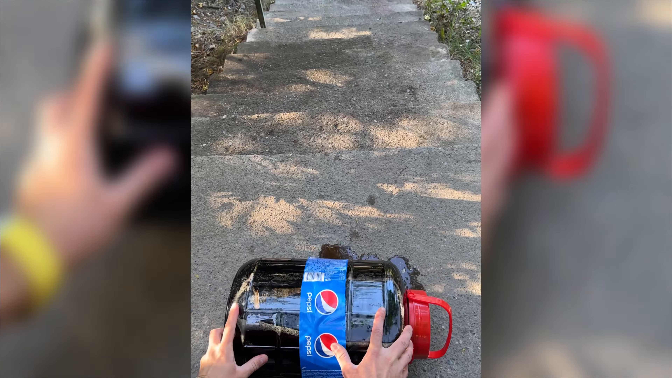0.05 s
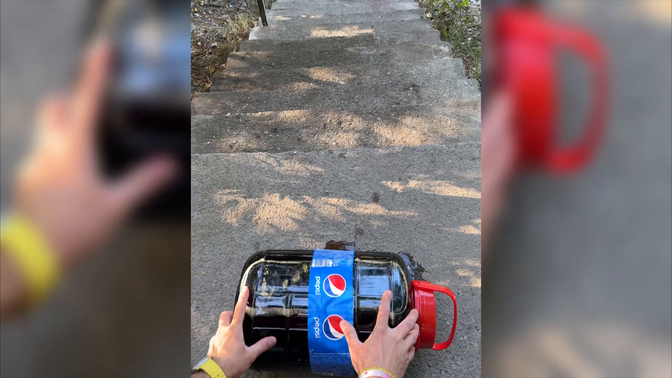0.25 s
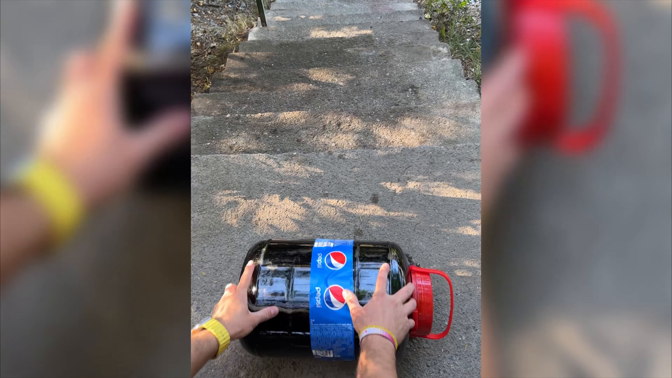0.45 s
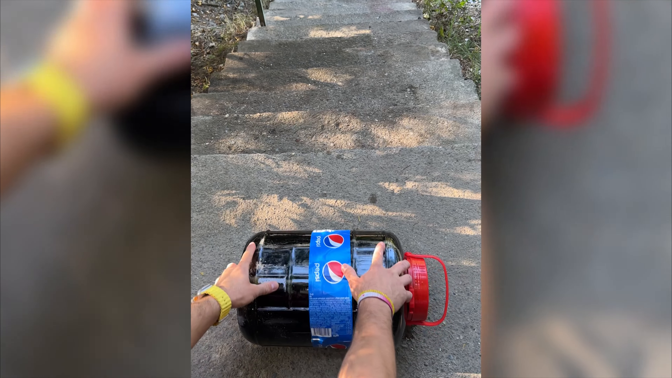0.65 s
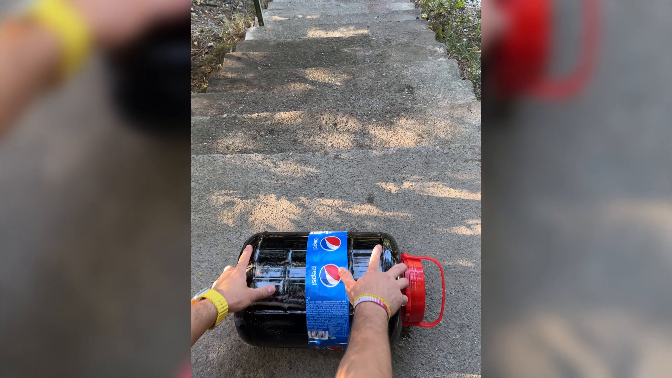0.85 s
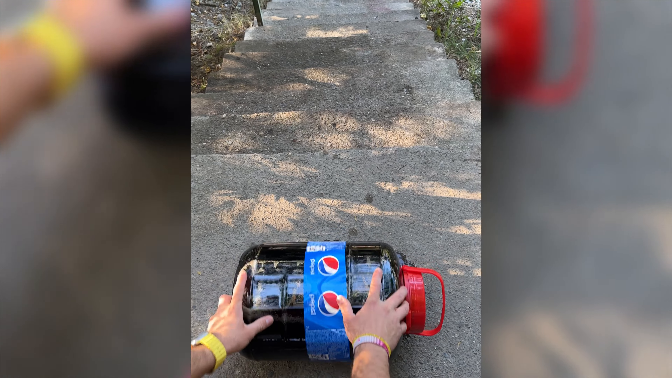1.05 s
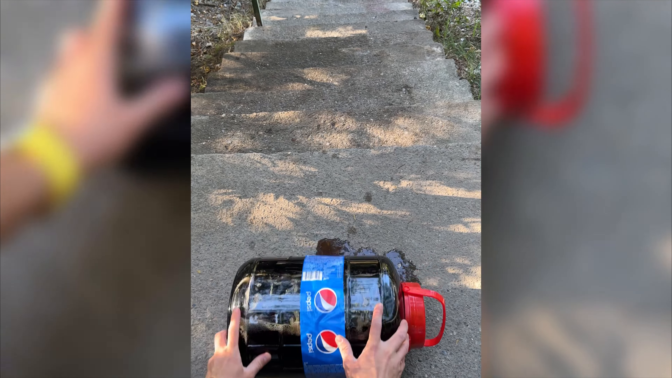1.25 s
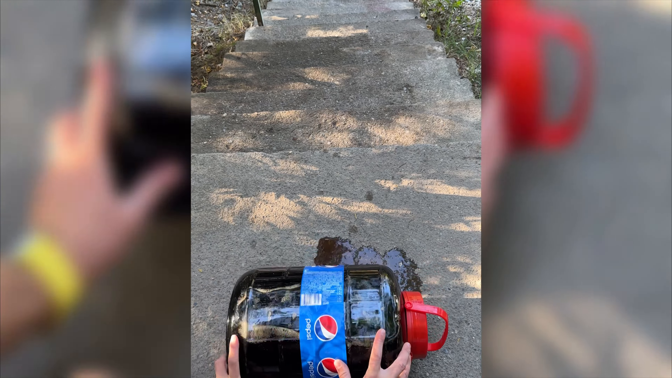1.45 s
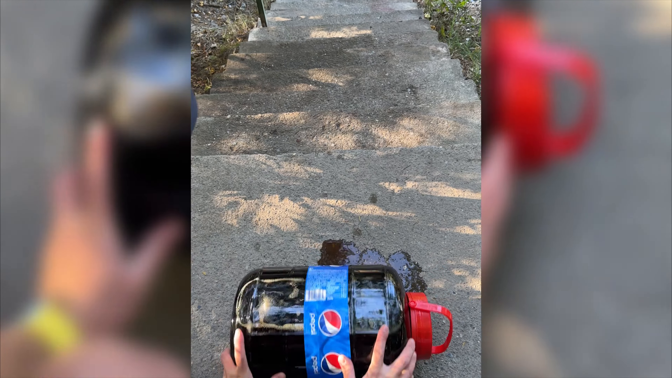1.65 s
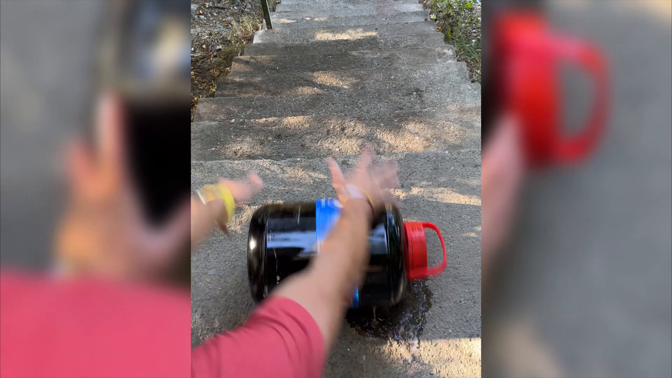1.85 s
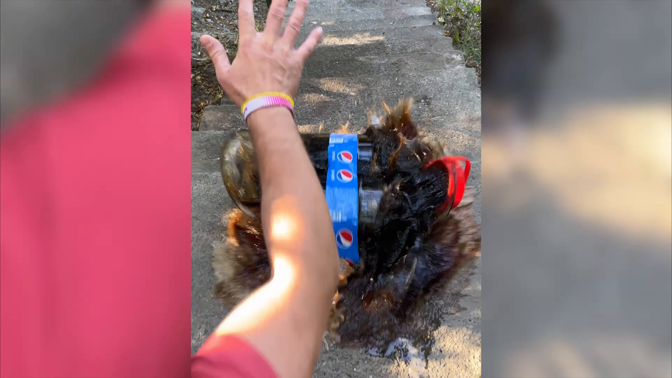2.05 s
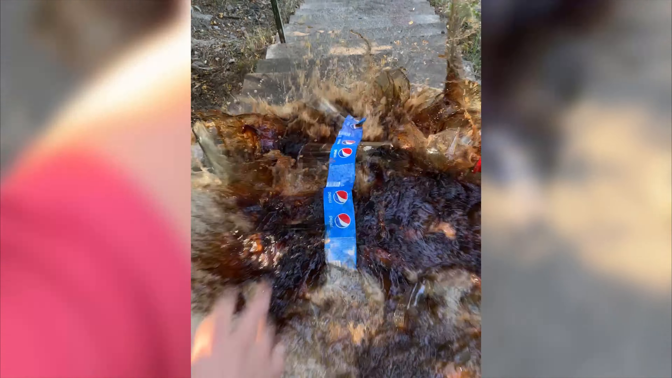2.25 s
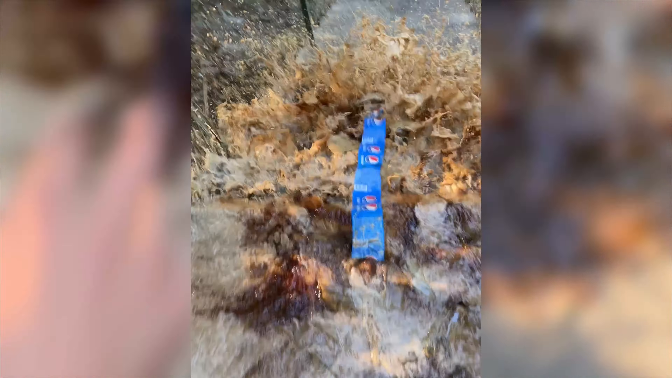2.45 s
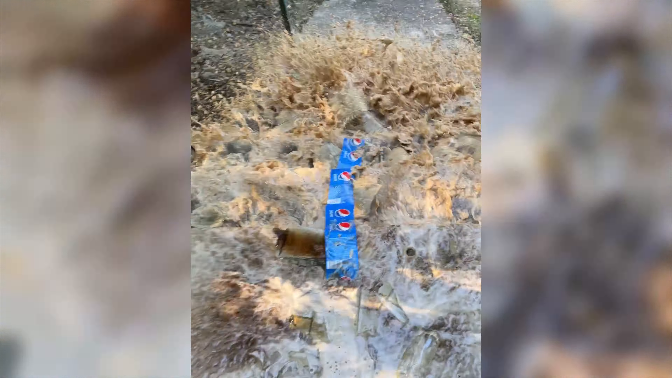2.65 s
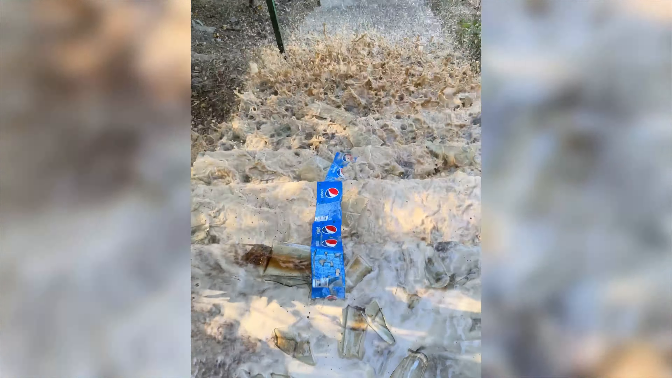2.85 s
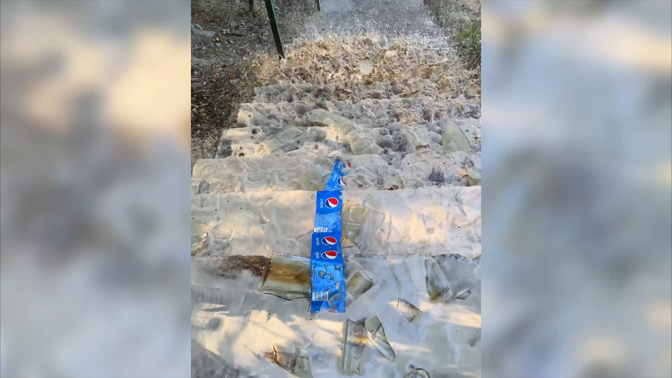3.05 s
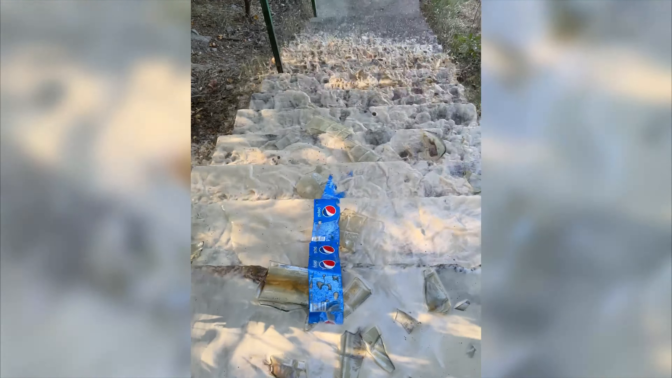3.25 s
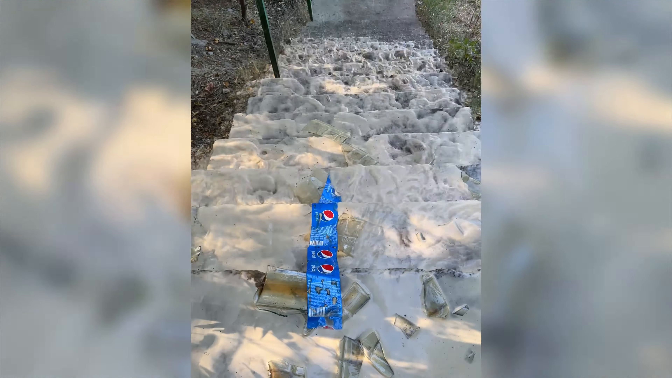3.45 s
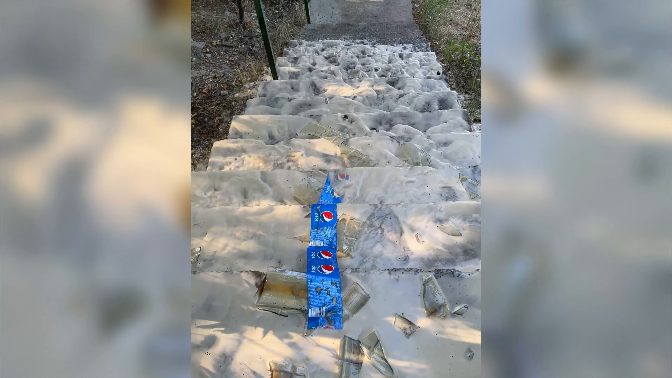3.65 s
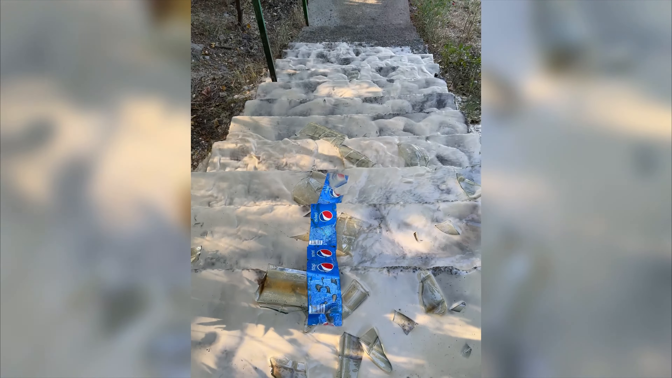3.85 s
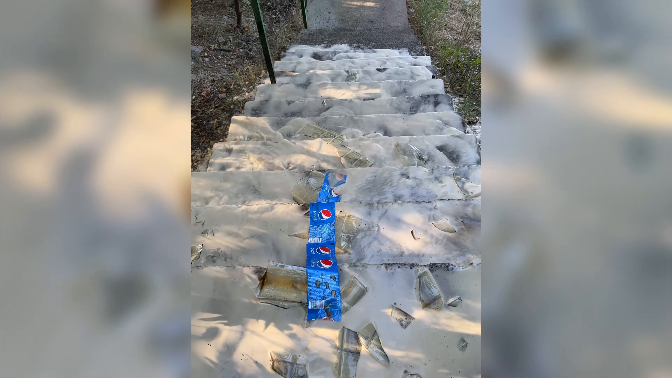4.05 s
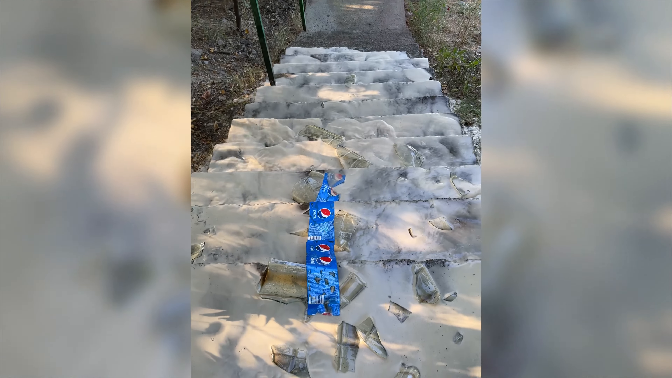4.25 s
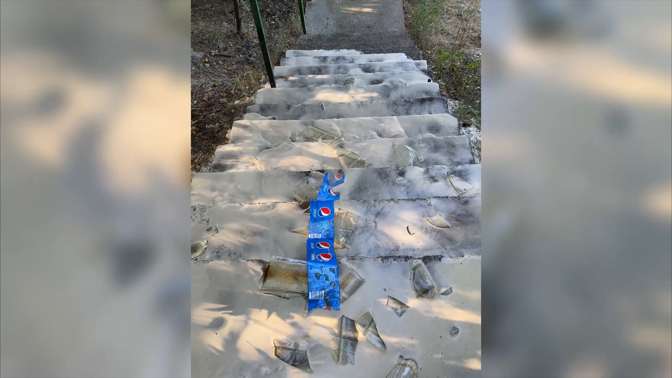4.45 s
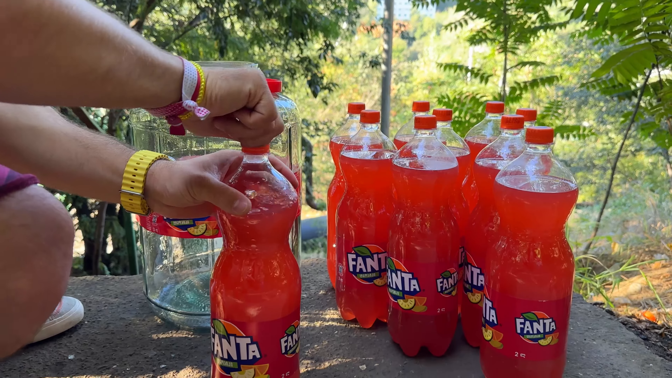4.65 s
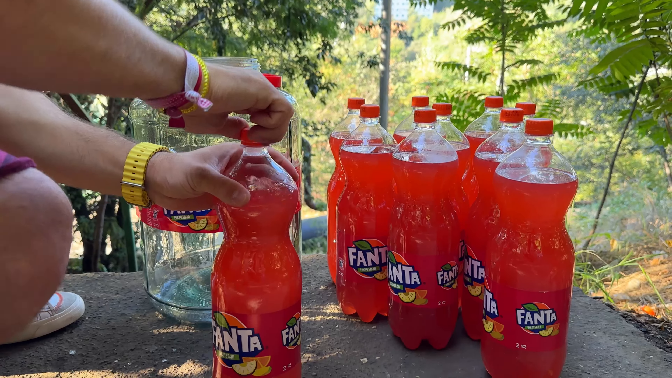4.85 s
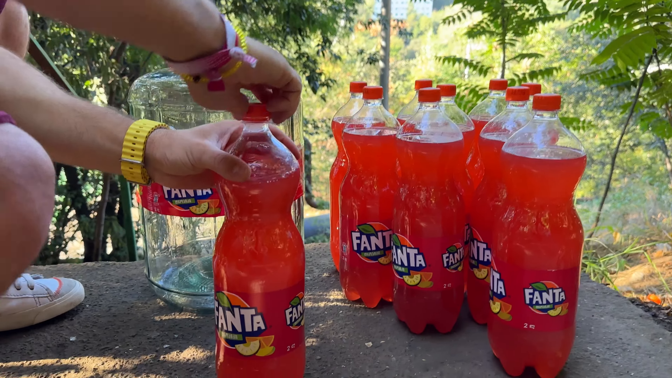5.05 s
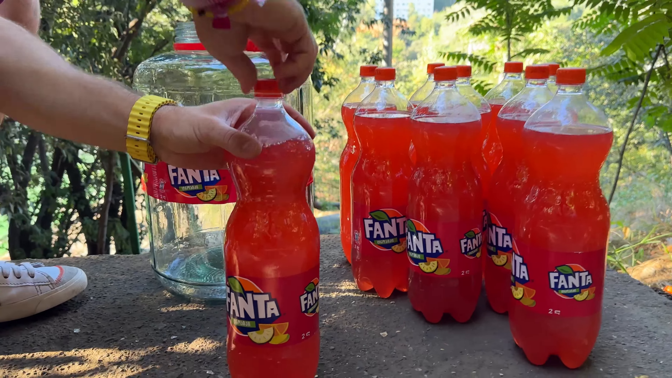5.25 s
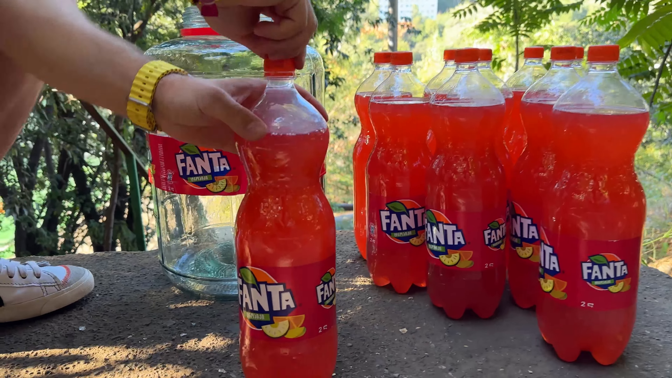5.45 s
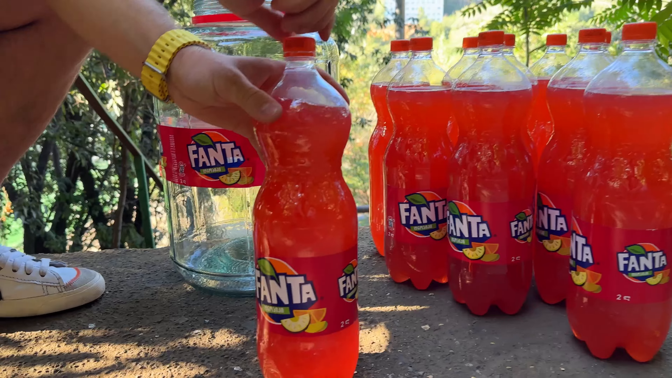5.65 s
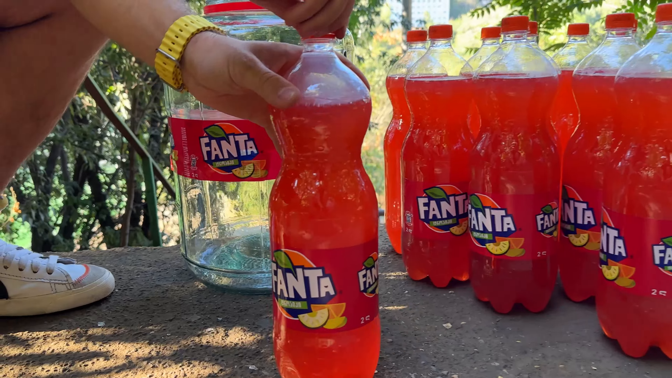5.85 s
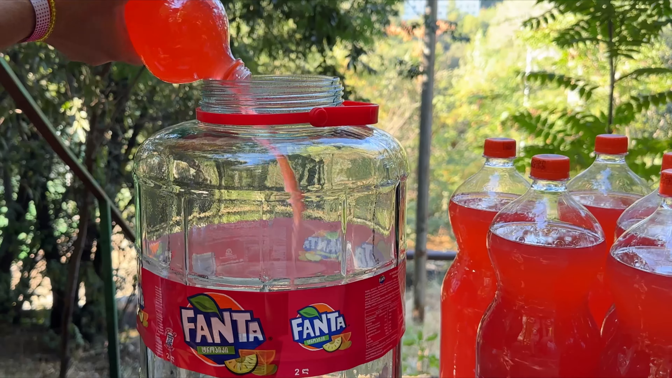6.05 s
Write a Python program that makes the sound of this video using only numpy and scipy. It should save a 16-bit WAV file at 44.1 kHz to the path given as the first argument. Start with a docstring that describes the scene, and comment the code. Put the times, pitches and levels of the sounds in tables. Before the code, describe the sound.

Quiet outdoor air with low distant traffic. From 0 to 1.7 s a heavy full glass jar is handled on gritty concrete: soft dull knocks and short scrapes, the clearest near 0.67 and 1.02 s. At 1.76 s it shatters: a dense, very loud run of crunching, ringing blows with thuds and a gush of liquid, strongest until about 2.0 s. It eases, then breaks hard again around 2.25 to 2.35 s, with splashing, splinters and fizz, and more clatter near 2.8 s. After 2.9 s shards clink sparsely, at 3.18, 3.5 and a bright skid at 3.81 s, over faint foam hiss. At 4.58 s the scene cuts abruptly to a fuller traffic wash with faint hum. At 5.01 s a plastic cap cracks open with a sputtering gas blast, ending sharply near 5.2 s. Light twisting scuffs and small clicks continue to about 6.1 s. Close microphone, short step echoes, wide stereo.

```python
"""A large glass jar of soda, nudged by hands over gritty concrete outdoors, bursts on the steps: each
shard blow is a burst of micro-cracks with decaying modes, and the drink gushes and fizzes as shaped noise.
The scene changes to a bottle cap, cracked open with a blast of gas and twisted further by damped modes,
scuffs and sputtering noise. Filtered noise gives the background: distant traffic, and a low rumble that
swells where the jar is moved and lands. Two ports hear it with phase and level differences over frequency."""
import sys
import numpy as np
from scipy import signal
from scipy.fft import rfft, irfft
from scipy.io import wavfile
from scipy.ndimage import uniform_filter1d

SR = 44100
rng = np.random.default_rng(int(sys.argv[2]) if len(sys.argv) > 2 else 0)


def dump(signal):
    """Clip the signal to [-1, 1] and save it as 16-bit WAV at the path in sys.argv[1]."""
    limited = np.clip(np.atleast_2d(signal).T, -1, 1)
    pcm = np.round(limited * 32767).astype(np.int16)
    wavfile.write(sys.argv[1], SR, pcm)


N = 269010
T = np.arange(N) / SR  # time in seconds

# Blows of the shards. Each row: start in seconds, dull crunch in dB, bright crunch in dB,
# low ring in Hz, its level in dB, high ring in Hz, its level in dB.
SHARD_BLOWS = [(1.764, -19, -17, 730, -8, 2120, -17), (1.777, -18, -12.5, 810, -10.5, 2840, -10),
               (1.793, -12, -15, 693, -15, 1840, -16), (1.808, -9, -11.5, 818, -11.5, 2050, -16),
               (1.844, -17, -9.5, 1710, -26, 3590, -16), (1.861, -6, -11.5, 1537, -15, 2240, -16.5),
               (1.878, -2, -14, 1700, -11, 4400, -7), (1.887, -13, -10, 1000, -10.5, 2250, -6.5),
               (1.918, -2.5, -21, 1610, -13, 3060, -16.5), (1.929, -10, -33, 650, -12, 2520, -28),
               (1.973, -7.5, -18, 638, -11, 2020, -24), (1.979, -24, -21, 597, -22, 2244, -14.5),
               (2.014, -11, -21.5, 807, -11.5, 2010, -22.5), (2.047, -29, -40, 1260, -29.5, 2460, -37),
               (2.061, -24, -26, 710, -21, 5700, -14.5), (2.069, -12, -10.5, 630, -13.5, 3660, -20),
               (2.092, -27, -36, 840, -19, 6100, -28), (2.112, -18, -45, 657, -19.5, 2640, -28.5),
               (2.124, -24, -27.5, 720, -9, 2590, -20), (2.14, -20, -24, 1270, -12, 2210, -25),
               (2.151, -22, -21, 743, -10.5, 2510, -16), (2.185, -36, -20, 670, -20, 2830, -28),
               (2.204, -28.5, -42, 668, -12, 2470, -35), (2.221, -26, -28, 684, -19, 2660, -27.5),
               (2.237, -24, -22, 920, -20, 4050, -16), (2.248, -7.5, -15, 820, -13, 2540, -11),
               (2.257, -6.5, -23, 638, -24, 2170, -16.5), (2.275, -6.5, -4, 1390, -9, 4100, -12),
               (2.292, -8, -5.5, 1410, -30.5, 6130, -7.5), (2.316, -22, -16, 1800, -19, 3030, -26),
               (2.324, -9.5, -11, 630, -18.5, 7070, -16.5), (2.351, -12.5, -9, 840, -20, 2230, -19.5),
               (2.398, -11.5, -24, 1500, -18, 2250, -16), (2.433, -13.5, -31, 565, -17, 1930, -16),
               (2.456, -18, -30, 510, -25, 2505, -12.5), (2.492, -30, -30, 1020, -17, 3740, -27),
               (2.504, -7, -22, 752, -10, 5860, -13.5), (2.52, -23, -43, 590, -16, 2620, -32),
               (2.562, -33, -47, 990, -24, 2240, -21), (2.574, -16.5, -53, 1023, -18, 2330, -21),
               (2.589, -25, -36, 1010, -20, 2230, -22), (2.612, -20, -22, 1010, -31, 2980, -17),
               (2.62, -9.5, -15, 1240, -16, 2000, -18), (2.643, -12, -21, 987, -12, 2850, -18),
               (2.659, -12, -29, 612, -16, 2150, -22), (2.674, -16, -18.5, 710, -12, 2440, -28),
               (2.699, -14, -20, 754, -12.5, 1970, -17), (2.717, -12, -19, 1042, -13.5, 2680, -17),
               (2.756, -40, -42, 1040, -27.5, 2530, -39), (2.783, -20, -43, 1648, -21.5, 2550, -29),
               (2.808, -16, -9, 1058, -14, 2646, -8), (2.839, -7, -8.5, 1080, -27, 2020, -11.5),
               (2.854, -9.5, -35, 1750, -22, 2930, -22), (2.873, -13, -37, 1767, -18, 2640, -16),
               (2.896, -20, -26.5, 1060, -27.5, 2700, -28.5), (2.975, -38, -32, 1690, -49, 4030, -35),
               (3.032, -32, -44, 1160, -40, 2670, -34), (3.071, -34, -27.5, 1920, -37, 2494, -21.5),
               (3.099, -28, -28, 1280, -31, 3680, -19), (3.135, -30.5, -44, 1095, -28, 2460, -36),
               (3.158, -28, -36, 1820, -28, 1900, -40), (3.178, -12.5, -19.5, 1086, -19.5, 4320, -47),
               (3.217, -12.5, -28, 1750, -19.5, 2470, -35), (3.239, -39, -34, 1780, -35, 2620, -28),
               (3.27, -28, -28, 1010, -50, 2650, -20), (3.298, -47, -26.5, 1050, -53, 2700, -20.5),
               (3.321, -27, -35, 1052, -34, 4260, -26), (3.362, -31, -30.5, 1060, -36, 2520, -41),
               (3.403, -31, -47, 1490, -37, 6260, -34), (3.454, -29, -42, 1450, -52, 1890, -30),
               (3.474, -17, -20.5, 1460, -40, 1930, -26), (3.519, -21.5, -16, 1098, -17.5, 6550, -28),
               (3.555, -44, -43, 1100, -45, 5800, -34), (3.584, -34, -24.5, 1150, -37, 6350, -29),
               (3.676, -42, -62, 1540, -44, 3560, -50), (3.81, -56, -12, 1790, -52, 2310, -23),
               (4.16, -49, -41, 517, -59, 4150, -51), (4.313, -50, -35, 694, -53, 2440, -55),
               (4.521, -39, -38.5, 1320, -47, 2630, -38)]
# Heavy pieces landing on the wet steps. Each row: start in seconds, level in dB, pitch in Hz.
HEAVY_THUDS = [(1.765, -19.5, 244), (1.792, -18, 467), (1.845, -20, 140), (1.876, -19.5, 118),
               (1.89, -16, 178), (1.916, -16.5, 349), (1.973, -15.5, 414), (2.149, -15.5, 221),
               (2.248, -20.5, 350), (2.257, -9.5, 186), (2.292, -18, 229), (2.35, -17.5, 251),
               (2.397, -20, 271), (2.457, -25, 218), (2.489, -19, 315), (2.674, -25, 409),
               (2.841, -21, 385), (2.894, -21, 395), (3.476, -29.5, 132), (3.81, -33, 163)]
# Modes of the largest curved shard. Each row: frequency in Hz, relative level in dB, T60 in seconds.
BIG_SHARD_MODES = [(1076, -2, 0.27), (1730, -3.5, 0.19), (2550, -22, 0.78), (2830, -19, 0.15),
                   (3670, -8, 0.27), (4310, 7.5, 0.06), (5100, 0, 0.12), (5577, 8.5, 0.042),
                   (6560, 0, 0.053), (7000, -3, 0.069), (8300, -10, 0.19)]
# Landings of that shard. Each row: start in seconds, level in dB.
BIG_SHARD_LANDINGS = [(2.575, -51), (2.81, -42), (2.84, -49), (2.874, -29), (3.03, -40), (3.098, -59),
                      (3.176, -22.5), (3.239, -59), (3.267, -42), (3.298, -37), (3.322, -40), (3.519, -57)]
# Clear rings of single shards. Each row: start in seconds, pitch in Hz, level in dB, T60 in seconds.
FREE_RINGS = [(1.762, 705, -9, .079), (2.0, 2700, -23, .04), (2.112, 680, -17.5, .39),
              (2.248, 300, -9.5, .066), (2.32, 7100, -16, .05), (2.561, 2240, -20.5, .13),
              (2.574, 1000, -23.5, .18), (2.808, 990, -19, .24), (2.808, 3400, -17.5, .06),
              (2.808, 5600, -19, .05), (2.808, 7050, -21, .05), (2.874, 3720, -29, .15),
              (2.885, 1100, -15.5, .062), (2.9, 400, -28, .078), (2.9, 1730, -31.5, .4),
              (3.07, 2500, -32, .058), (3.098, 5800, -27, .045), (3.13, 6100, -33, .05),
              (3.19, 2400, -24.5, .2), (3.238, 2400, -30, .09), (3.454, 1480, -34, .24),
              (3.4755, 1500, -31, .16), (3.4755, 6350, -39, .13), (3.4755, 8300, -28.5, .12),
              (3.518, 1135, -36, .11), (3.584, 1140, -31, .09), (3.81, 2200, -15, .035),
              (3.81, 5730, -22, .04), (3.81, 2335, -36, .3), (3.81, 2385, -27.5, .27),
              (3.81, 3365, -32, .12), (3.99, 2360, -42, .21), (4.313, 2360, -44, .08),
              (4.313, 3400, -44, .07), (4.313, 5800, -42, .04)]
# Level curves of the flowing liquid, loose splinters and foam. Each row: time in seconds, level in dB.
GUSH_LEVEL = [(1.755, -22), (1.765, -22.5), (1.9, -20.5), (2.06, -24.5), (2.2, -27.5), (2.26, -23.5),
              (2.48, -28), (2.73, -30), (2.9, -32), (2.95, -48.5), (3.1, -55)]
SPRAY_LEVEL = [(1.755, -55), (1.8, -28), (1.9, -20), (2.1, -57), (2.24, -63), (2.4, -42), (2.72, -36),
               (2.95, -38.5), (3.1, -45)]
FOAM_LEVEL = [(1.75, -65), (1.8, -57), (1.88, -38), (1.94, -33), (2.12, -56.5), (2.5, -34), (2.88, -40),
              (3.57, -47.5), (4.58, -47.5)]
# Knocks of the handled jar, then of the bottle cap. Each row: start in seconds, dull crunch in dB,
# bright crunch in dB, ring in dB, thump in dB.
JAR_KNOCKS = [(0.036, -36, -45, -43.5, -46), (0.058, -30, -49, -40, -58), (0.191, -40, -50, -44, -43),
              (0.349, -41, -47, -35, -46), (0.373, -33, -24.5, -34, -36), (0.387, -31, -47, -35, -45),
              (0.431, -35, -64, -40, -38), (0.564, -39, -48, -53, -51), (0.606, -31.5, -28, -53, -42),
              (0.671, -19.5, -25.5, -35, -44), (0.846, -44, -41, -45, -48), (0.898, -41, -46, -47, -54),
              (0.953, -50, -55, -41, -55), (1.014, -31, -21.5, -28.5, -51), (1.026, -20.5, -27, -50, -45),
              (1.06, -27, -30, -27, -39.5), (1.122, -47, -35.5, -35, -45), (1.159, -34.5, -61, -33, -31),
              (1.202, -34, -34, -34, -36), (1.361, -51, -44, -52, -41), (1.418, -53, -45, -35.5, -46),
              (1.667, -53, -40, -43, -34), (1.712, -46, -45, -31, -31)]
CAP_KNOCKS = [(5.014, -11.5, -33, -28, -27), (5.289, -51, -37, -42, -54), (5.316, -48, -32, -51, -54),
              (5.335, -46, -44, -52, -52), (5.516, -32.5, -65, -48, -45), (5.583, -27, -52, -33, -38),
              (5.609, -31, -62, -37, -41), (5.841, -42, -47, -43, -30), (5.975, -48, -51, -47, -55)]
# Modes of the full jar, its weight on the concrete, the plastic cap and neck, and the bottle's thump.
# Each row: frequency in Hz, relative level in dB, T60 in seconds.
JAR_MODES = [(567, -4, 0.066), (824, -1.5, 0.076), (1100, -2, 0.072), (1280, -10.5, 0.064),
             (1548, -0.5, 0.053), (2230, -7, .05), (2890, -2, 0.053), (3210, -10, 0.026),
             (4090, -16, 0.026)]
JAR_THUMP_MODES = [(129, 3, 0.11), (188, 7, 0.065)]
CAP_MODES = [(890, -4, .026), (1063, 7, 0.027), (1290, 6, 0.046), (2060, -9, .02), (4300, -15.5, 0.019),
             (6100, -5, .017)]
BOTTLE_THUMP_MODES = [(152, 4, 0.096), (213, 1, 0.15)]
# Scuffs of the handled jar on grit, then shards skidding; and scuffs of fingers on the cap.
# Each row: start in seconds, length in seconds, bright scrape in dB, dull body in dB.
GRIT_STROKES = [(.02, 0.077, -45.5, -52), (.18, 0.041, -58, -46), (.22, 0.045, -58, -49),
                (.345, 0.07, -47.5, -40.5), (.428, 0.029, -77, -45), (.6, 0.022, -42, -56),
                (.675, 0.055, -85, -48), (.85, 0.02, -49, -45), (.893, 0.027, -64, -45.5),
                (1.015, 0.072, -53, -41.5), (1.12, 0.12, -50.5, -42), (1.36, 0.018, -56, -59),
                (1.41, 0.069, -56, -42.5), (1.58, 0.066, -57.5, -69), (1.665, 0.099, -47, -44),
                (3.06, 0.026, -47, -47), (3.808, 0.091, -37, -78)]
CAP_STROKES = [(4.66, 0.11, -54.5, -47.5), (5.28, 0.084, -45, -66), (5.495, 0.079, -44, -58),
               (5.565, 0.097, -42, -50), (5.75, 0.038, -53.5, -61), (5.825, 0.045, -44, -38.5),
               (5.965, 0.0442, -57, -55), (6.07, 0.057, -60, -49), (5.35, 0.11, -56, -68),
               (5.65, 0.37, -53, -50)]
# Relative spectra of cracking glass, grit, foam, rubbed cap, escaping gas, and the background as heard
# around the steps and around the bottles. Each row: frequency in Hz, density in dB per Hz.
CRACK_SPECTRUM = [(300, -14), (700, -28), (1500, -13), (2500, -2), (3200, -5.5), (4500, -0.5), (6000, 2.5),
                  (7000, 3.5), (8500, -2.5), (10500, -0.5), (13000, -4), (15500, -19)]
GRIT_SPECTRUM = [(300, -2), (700, -31), (1500, -1.5), (2500, 1.5), (3200, 1), (4500, 0), (6000, -0.5),
                 (7000, -1), (8500, -5), (10500, -5), (13000, -6), (15500, -17)]
FOAM_SPECTRUM = [(150, -30), (400, -0.5), (700, -7.5), (1300, -21), (2200, -1.5), (4500, -2), (6500, 2.5),
                 (9000, -0.5), (12000, -4.5), (15500, -2)]
CAP_RUB_SPECTRUM = [(300, -9), (1500, 10.5), (3200, 2), (4500, -3), (6000, -4.5), (8500, -4), (10500, -4.5),
                    (13000, -18.5), (15500, -10.5)]
GAS_SPECTRUM = [(300, -20), (700, -26.5), (1500, -14), (2500, -7.5), (3200, -9.5), (4500, -8.5),
                (6000, -3.5), (7000, -10), (8500, -0.5), (10500, -2.5), (13000, -3), (15500, -2.5)]
STEPS_AIR_SPECTRUM = [(30, -2.5), (60, 5), (120, -2), (200, -8.5), (400, -8), (700, -14), (1300, -17),
                      (2200, -21), (3200, -27), (4500, -37.5), (6500, -41), (9000, -49.5), (12000, -66),
                      (15000, -49.5)]
BOTTLES_AIR_SPECTRUM = [(30, -4), (60, 6.5), (120, -3), (200, -4.5), (400, -14.5), (700, -14), (1300, -8.5),
                        (2200, -16), (3200, -22.5), (4500, -37), (6500, -38), (9000, -48), (12000, -57.5),
                        (15000, -65.5)]
# Level curve of the low rumble: distant traffic, swelling where the jar is moved and lands.
# Each row: time in seconds, level in dB.
RUMBLE_LEVEL = [(0, -43.5), (.78, -44.5), (1.19, -39), (1.32, -45.5), (1.41, -36.5), (1.63, -49),
                (1.8, -30), (1.9, -28), (1.96, -60.5), (2.29, -55.5), (2.6, -50.5), (4.1, -53.5),
                (4.3, -49), (5.45, -48.5), (5.9, -43), (6.1, -42)]
# Level curves of the wash of traffic and of a wavering hum near 125 Hz.
# Each row: time in seconds, level in dB.
WASH_LEVEL = [(0, -44.5), (1.3, -45.5), (1.7, -46.5), (3.3, -50.5), (4, -51), (4.57, -51), (4.59, -42),
              (4.9, -40.5), (6.1, -41.5)]
HUM_LEVEL = [(4.58, -43), (4.8, -44), (5.3, -46.5), (5.5, -68), (6.1, -61)]
# The two ports on the steps, at the bottles, and for the air around the bottles. Each row:
# frequency in Hz, likeness from 0 to 1, lead of the right port in radians, left over right in dB.
STEPS_PORTS = [(40, .96, 0, .3), (150, 1, 0, .3), (400, .97, -.2, 2), (800, .98, 0, 2), (1900, 1, 0, 0),
               (2600, .75, -.1, -.7), (3200, .6, -.1, 0), (4000, .7, -.1, 2), (5000, .29, -.3, .8),
               (6000, .89, .7, 0), (7500, .86, 1.6, .5), (9000, .78, 1.7, -.5), (10200, .82, 2.6, 1),
               (10800, .995, 3.12, 0), (13200, .995, 3.16, 0), (14000, .84, 3.7, .3), (15500, .7, 4.4, 0)]
BOTTLES_PORTS = [(100, .94, -.1, -1), (400, .6, -1, 0), (900, .3, -1.6, 4), (1600, .2, -2.5, 1),
                 (2500, .2, -2.8, -2), (2950, .99, -3.14, 0), (3350, .99, -3.14, 0), (4200, .4, -6, 2),
                 (5200, .4, -7, 7), (6000, .66, -6.7, 8.5), (7500, .45, -6.3, 4), (9000, .62, -4.2, 0),
                 (10200, .72, -4, 1), (10600, .999, -3.14, 0), (11700, .999, -3.14, 0), (12500, .83, -2, 0),
                 (13800, .97, -.1, 0), (15500, .87, .9, 0)]
AIR_PORTS = [(100, .92, 0, -1), (400, .7, -.6, -1), (800, .25, -1.4, 3), (1500, .3, -3, 3),
             (2500, .15, -3, 0), (5000, .2, -6, 7), (8000, .15, -6, 4), (10000, .55, -4.5, -2),
             (11000, .95, -3.14, 0), (14000, .97, 0, 0)]

LOW_RING_T60, HIGH_RING_T60, THUD_T60 = 0.048, 0.033, 0.13  # seconds
CRACK_SPREAD_DB, BODY_SPREAD_DB = 3.3, 3.5  # spread of the random grains
SHARD_SPOT_DB, HAND_SPOT_DB, THUMP_SPOT_DB = 2.2, 3.0, 2.7  # random variation of each mode per blow
SLAP_DB, SLAP_T60 = -17.5, 0.043  # each dull blow splashes
SPRAY_DB, SPRAY_T60 = -8.5, 0.12  # each bright blow throws splinters
STEPS_T60, STEPS_DB = 0.15, -11.5  # echoes from the steps
GAS_S, GAS_PEAK_S, GAS_STOP_S = 5.0135, 5.09, 5.178  # opening, start of the sag, start of the fall
GAS_DB, GAS_START_DB, GAS_SWELL_S = -9, -14, 0.019  # level, offset at opening, its time constant
GAS_SAG_DB, GAS_FALL_DB_PER_S = -6.5, 481.5
THIN_DB, THIN_RISE_S, THIN_HOLD_S, THIN_FALL_DB_PER_S = -51, 0.022, 0.13, 118  # the hold ends at 0.13 s
UNSHARED_RUMBLE_DB = -21.5  # relative to the rumble
CUT_S = 4.578  # the scene changes from steps to bottles
DIP_S = 5.96  # brief dip of the background level, as at an edit
EDGE_HZ = 15850  # upper band limit


def gain_of(db):
    """Amplitude ratio: 20 dB is a factor of ten."""
    return 10 ** (np.asarray(db) / 20)


def evened(x):
    """Normalization to unit root-mean-square."""
    return x / np.sqrt(np.mean(x ** 2) + 1e-20)


def read(points, hz, axis=1):
    """Interpolation of one table column along logarithmic frequency."""
    table = np.asarray(points, float)
    return np.interp(np.log(hz + 1), np.log(table[:, 0] + 1), table[:, axis])


def level(rows, axis=1):
    """Envelope interpolated in decibels; it is silent outside its span."""
    table = np.asarray(rows, float)
    return gain_of(np.interp(T, table[:, 0], table[:, axis], -200, -200))


def coloured(x, spectrum):
    """Spectral shaping: each frequency is scaled, then the whole is set to unit rms."""
    gains = gain_of(read(spectrum, np.fft.rfftfreq(len(x), 1 / SR)))
    return evened(irfft(rfft(x) * gains, len(x)))


def band(x, low_hz, high_hz):
    """Band-pass filtering to unit rms."""
    return evened(signal.sosfilt(signal.butter(2, [low_hz, high_hz], "band", fs=SR, output="sos"), x))


def lowpassed(x, hz):
    """Low-pass filtering with zero phase, so that the remainder can be had by subtraction."""
    return signal.sosfiltfilt(signal.butter(2, hz, fs=SR, output="sos"), x)


def grains(per_s, spread_db):
    """Random point process of impulses with exponentially spread levels."""
    size = gain_of(spread_db * np.minimum(rng.exponential(1, N), 4))
    return size * (rng.random(N) < per_s / SR)


def gritty(per_s, spread_db, grain_s):
    """Modulated noise: its power jumps with each random grain and decays exponentially."""
    power = signal.lfilter([1], [1, -np.exp(-1 / (grain_s * SR))], grains(per_s, spread_db) ** 2)
    return evened(np.sqrt(power + 0.12) * rng.standard_normal(N))


def ring(hz, db, t60, t):
    """Damped mode: a sine that loses 60 dB in t60 seconds."""
    return gain_of(db - 60 * t / t60) * np.sin(2 * np.pi * hz * t)


def add(mix, s, sound):
    """Superposition of a sound onto the mix from s seconds."""
    part = mix[round(s * SR):][:len(sound)]
    part += sound[:len(part)]


def blows(rows, spectrum, crack_t60):
    """Impact: a contact tick, then a decaying crunch of micro-cracks with dull and bright parts."""
    out, dull, bright, t = np.zeros(N), np.zeros(N), np.zeros(N), T[:SR // 4]
    decay = np.exp(-t / 0.002) + 0.34 * gain_of(-60 * t / crack_t60)
    crunch = (1 - np.exp(-t / 0.00099)) * decay
    tick_t = t[:400]
    dull_tick = ring(1560, 0.31, 0.005, tick_t)
    bright_tick = ring(6500, 2.0, 0.005, tick_t) + ring(14000, 0, 0.005, tick_t)
    for s, db, bright_db, *_ in rows:
        add(dull, s, gain_of(db) * crunch)
        add(bright, s, gain_of(bright_db) * crunch)
        add(out, s, gain_of(db) * dull_tick + gain_of(bright_db) * bright_tick)
    cracks = coloured(gritty(1200, CRACK_SPREAD_DB, 0.0017), spectrum)
    low_part = lowpassed(cracks, 4000)
    return out + dull * evened(low_part) + bright * evened(cracks - low_part)


def struck(rows, modes, spot_db, rise_s, axis=1):
    """Modal excitation: the point struck sets each mode's share, so it varies from blow to blow."""
    out, t = np.zeros(N), T[:SR // 3]
    shapes = np.array([ring(hz, db, t60, t) for hz, db, t60 in modes])
    shapes = shapes * (1 - np.exp(-t / rise_s))
    spots = gain_of(spot_db * rng.standard_normal((len(rows), len(modes))))
    for row, spot in zip(rows, spots):
        add(out, row[0], gain_of(row[axis]) * (spot @ shapes))
    return out


def shards():
    """Beating of neighbouring modes: each shard gives two close pairs; heavy pieces add a low thud."""
    out, t = np.zeros(N), T[:SR // 8]
    rise = 1 - np.exp(-t / 0.0023)
    twins = rng.uniform(-0.98, 1, (len(SHARD_BLOWS), 2))  # detuning of each weaker twin
    for (s, _, _, low_hz, low_db, high_hz, high_db), (a, b) in zip(SHARD_BLOWS, twins):
        low = ring(low_hz, low_db, LOW_RING_T60, t)
        low += ring(low_hz * (1 + 0.1 * a), low_db - 8.5, LOW_RING_T60, t)
        high = ring(high_hz, high_db, HIGH_RING_T60, t)
        high += ring(high_hz * (1 + 0.084 * b), high_db - 23, HIGH_RING_T60, t)
        add(out, s, rise * low + high)
    for s, db, hz in HEAVY_THUDS:
        add(out, s, rise * ring(hz, db, THUD_T60, t))
    big_shard = struck(BIG_SHARD_LANDINGS, BIG_SHARD_MODES, SHARD_SPOT_DB, 0.0001)
    return out + blows(SHARD_BLOWS, CRACK_SPECTRUM, 0.029) + big_shard


def clear_rings():
    """Free vibration: shards that fly free ring on, each mode beating as a close pair."""
    out, t = np.zeros(N), T[:SR // 2]
    for s, hz, db, t60 in FREE_RINGS:
        beat = 1 + 0.29 * np.cos(2 * np.pi * 0.03 * hz * t)
        add(out, s, ring(hz, db, t60, t) * beat * (1 - np.exp(-t / 0.0016)))
    return out


def splinters():
    """Superposed short resonances: many splinters ring at their own pitches, the higher the shorter."""
    out, t = np.zeros(N), T[:1500]
    for hz in np.geomspace(1200, 12000, 30) * rng.uniform(0.89, 1.05, 30):
        chime = ring(hz, read(CRACK_SPECTRUM, hz), 90 / hz, t)
        out += signal.oaconvolve(grains(30, 4.0), chime)[:N]
    return evened(evened(out) + 0.34 * coloured(gritty(500, 1.6, 0.0013), CRACK_SPECTRUM))


def after_blows(t60, axis):
    """Energy decay: power jumps at each shard blow by its strength and dies away."""
    power = np.zeros(N)
    for row in SHARD_BLOWS:
        power[round(row[0] * SR)] += gain_of(2 * row[axis])
    return np.sqrt(signal.lfilter([1], [1, -gain_of(-120 / (t60 * SR))], power))


def burst():
    """Turbulent flow as lumpy noise: liquid slaps the steps, splinters spray and foam hisses on."""
    wet = level(GUSH_LEVEL) + gain_of(SLAP_DB) * after_blows(SLAP_T60, axis=1)
    spray = level(SPRAY_LEVEL) + gain_of(SPRAY_DB) * after_blows(SPRAY_T60, axis=2)
    liquid = band(gritty(220, 3.73, 0.0039), 292, 1420)
    foam = coloured(gritty(2500, 0.67, 0.00079), FOAM_SPECTRUM)
    return wet * liquid + spray * splinters() + level(FOAM_LEVEL) * foam


def echoes(t60):
    """Diffuse reflection: sparse taps of random sign die away, with total energy 1."""
    taps, t = np.zeros(SR // 3), T[:SR // 3]
    at = np.arange(120, SR // 3 - 20, 20)
    taps[at + rng.integers(0, 20, len(at))] = rng.choice([-1., 1.], len(at))
    taps = band(taps * gain_of(-60 * t / t60), 413, 8960)
    return taps / np.linalg.norm(taps)


def handled(rows, modes, thump, crack_t60):
    """Coupled impact: a vessel knocked in the hands gives a crunch, a ring and a thump."""
    crunch = blows(rows, GRIT_SPECTRUM, crack_t60)
    ringing = struck(rows, modes, HAND_SPOT_DB, 0.0044, axis=3)
    return crunch + ringing + struck(rows, thump, THUMP_SPOT_DB, 0.0012, axis=4)


def scuffs(rows, spectrum, spread_db):
    """Sliding friction: gritty strokes give a bright scrape that trails off and a dull body under it."""
    bright, body = np.zeros(N), np.zeros(N)
    for s, length, db, body_db in rows:
        stroke = signal.windows.tukey(round(length * SR), 0.5)
        add(bright, s, gain_of(db) * stroke)
        add(body, s, gain_of(body_db) * stroke)
    r = np.exp(-1 / (0.043 * SR))
    bright = bright + 0.14 * signal.lfilter([1 - r], [1, -r], bright)  # the trail
    scrape = coloured(gritty(400, spread_db, 0.0016), spectrum)
    return bright * scrape + body * band(gritty(170, BODY_SPREAD_DB, 0.022), 135, 860)


def gas():
    """Jet noise: gas sputters through the cap thread, swells, sags, then the pressure runs out."""
    t = np.maximum(T - GAS_S, 0)
    swell = GAS_START_DB * np.exp(-t / GAS_SWELL_S)
    sag = GAS_SAG_DB * np.clip((T - GAS_PEAK_S) / (GAS_STOP_S - GAS_PEAK_S), 0, 1) ** 2
    fall = GAS_FALL_DB_PER_S * np.maximum(T - GAS_STOP_S, 0)
    opening = np.minimum(t / 0.0018, 1)
    jet = coloured(gritty(2500, 1.2, 0.005), GAS_SPECTRUM)
    return opening * gain_of(GAS_DB + swell + sag - fall) * jet


def thin_hiss():
    """Narrow-band noise, about 7 to 8 kHz, rises at the start, holds and fades."""
    fade_db = THIN_FALL_DB_PER_S * np.maximum(T - THIN_HOLD_S, 0)
    shape = np.minimum(T / THIN_RISE_S, 1) * gain_of(THIN_DB - fade_db)
    return shape * band(band(gritty(300, 1.0, 0.011), 7100, 8000), 6800, 8400)


def background(spectrum):
    """Filtered random noise: low rumble, wash of traffic and hum, with one brief dip of their level."""
    noise = coloured(rng.standard_normal(N), spectrum)
    rumble = band(noise, 41, 141)
    wash = evened(noise - lowpassed(noise, 160))
    hum = band(rng.standard_normal(N), 114.6, 132.4)
    dip = 1 - 0.81 * np.exp(-((T - DIP_S) / 0.0065) ** 2)
    return dip * (level(RUMBLE_LEVEL) * rumble + level(WASH_LEVEL) * wash + level(HUM_LEVEL) * hum)


def unshared_rumble():
    """Antiphase: an added deep rumble has opposite sign at the two ports."""
    noise = band(rng.standard_normal(N), 30, 105)
    low = gain_of(UNSHARED_RUMBLE_DB) * level(RUMBLE_LEVEL) * noise
    return np.array([low, -low])


def ports(x, table, size):
    """Interchannel coherence: a fixed phase shift plus a drift, wider where the ports are less alike."""
    hz, _, z = signal.stft(x, SR, nperseg=256, noverlap=192)
    same, turn, tilt = (read(table, hz, axis=k)[:, None] for k in (1, 2, 3))
    drift = rng.standard_normal((2,) + z.shape)
    drift = uniform_filter1d(drift, size=size, axis=2)  # smooth in time
    drift = evened(uniform_filter1d(drift, size=3, axis=1))  # and in frequency
    side = np.array([-0.5, 0.5])[:, None, None]  # left, right
    paths = np.exp(1j * (side * turn + np.sqrt(-np.log(same)) * drift))
    heard = z * paths * gain_of(-side * tilt)
    return signal.istft(heard, SR, nperseg=256, noverlap=192)[1][:, :N]


def scene():
    """Superposition of sources at the steps, crossfaded into those at the bottles."""
    glass = shards() + handled(JAR_KNOCKS, JAR_MODES, JAR_THUMP_MODES, 0.033)
    reflected = signal.oaconvolve(glass, echoes(STEPS_T60))[:N]
    crash = glass + gain_of(STEPS_DB) * reflected + clear_rings() + burst()
    crash = signal.sosfilt(signal.butter(3, 110, "high", fs=SR, output="sos"), crash)
    steps = crash + scuffs(GRIT_STROKES, GRIT_SPECTRUM, 1.6)
    steps = steps + background(STEPS_AIR_SPECTRUM) + thin_hiss()
    bottles = handled(CAP_KNOCKS, CAP_MODES, BOTTLE_THUMP_MODES, 0.09)
    bottles = bottles + scuffs(CAP_STROKES, CAP_RUB_SPECTRUM, 0.89) + gas()
    later = ports(bottles, BOTTLES_PORTS, size=2)
    later = later + ports(background(BOTTLES_AIR_SPECTRUM), AIR_PORTS, size=2)
    after = np.clip((T - CUT_S) / 0.0044, 0, 1)
    return (1 - after) * ports(steps, STEPS_PORTS, size=5) + after * later + unshared_rumble()


def record(dry):
    """Saturation: the loudest cracks overload softly, then the band is limited."""
    soft = 0.9 * np.tanh(dry / 1.205)
    lowpass = signal.firwin(511, EDGE_HZ, window=("kaiser", 9), fs=SR)
    return signal.oaconvolve(soft, lowpass[None], "same")


dry = scene()
out = record(dry)
dump(out)
```